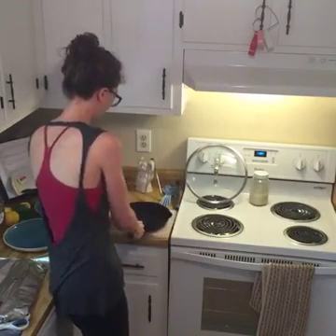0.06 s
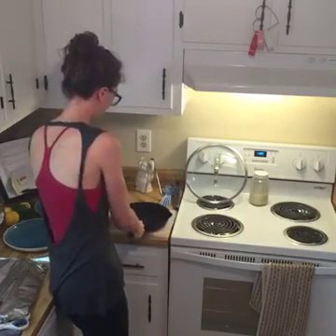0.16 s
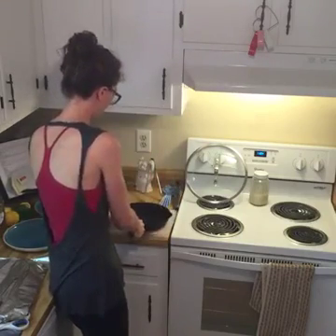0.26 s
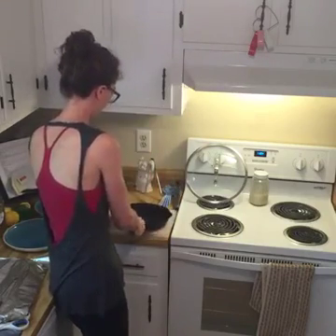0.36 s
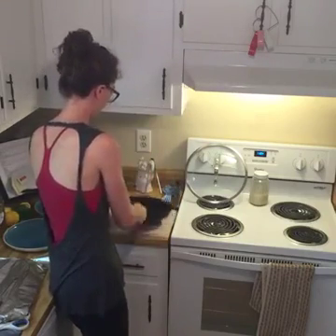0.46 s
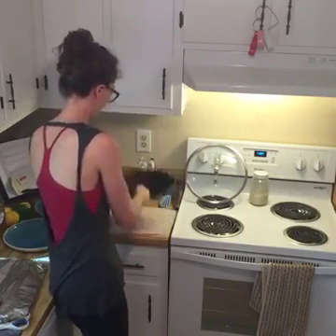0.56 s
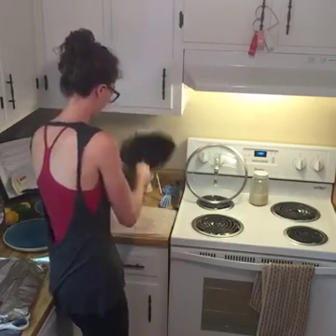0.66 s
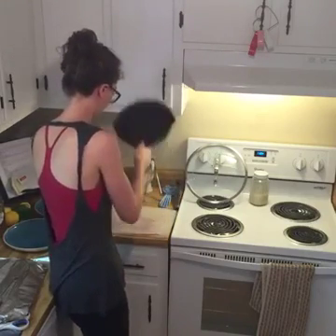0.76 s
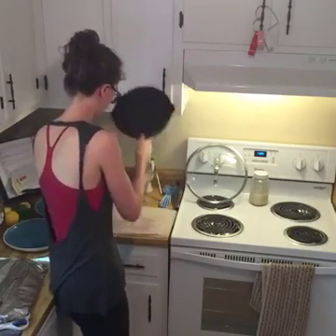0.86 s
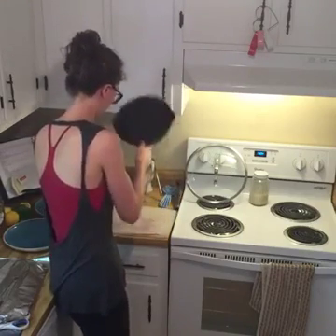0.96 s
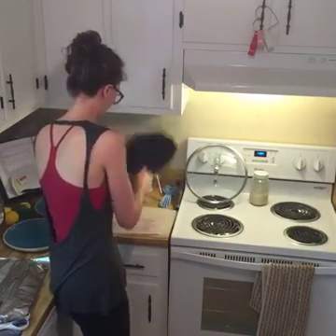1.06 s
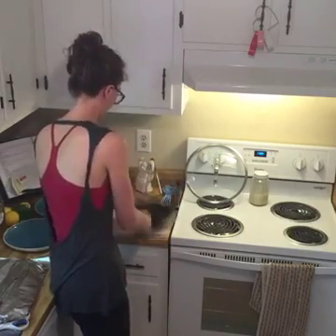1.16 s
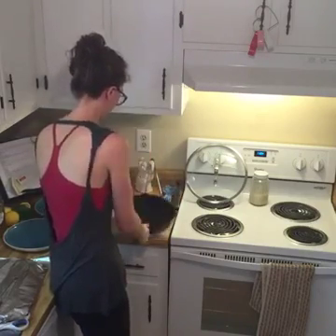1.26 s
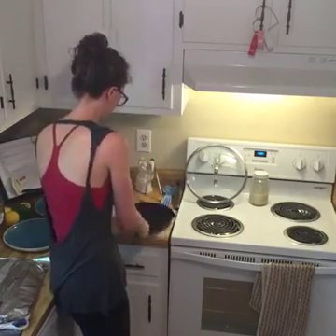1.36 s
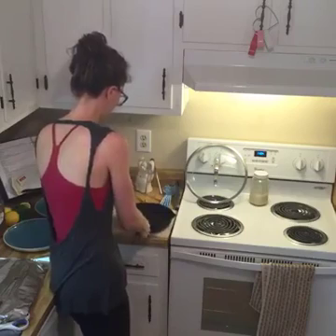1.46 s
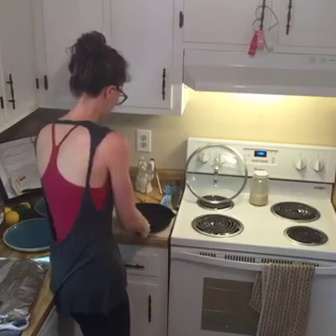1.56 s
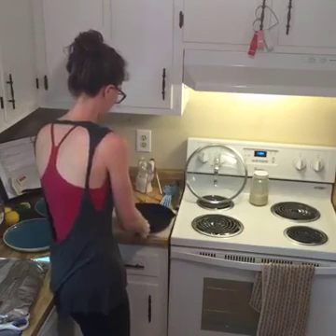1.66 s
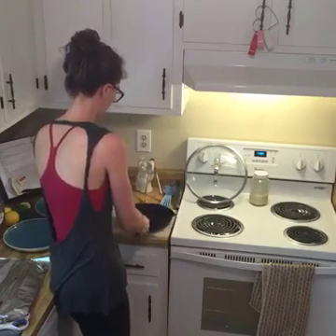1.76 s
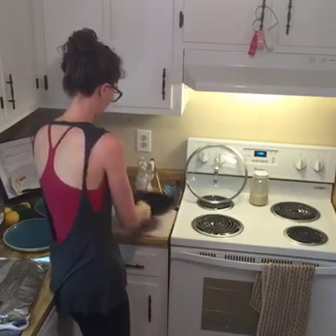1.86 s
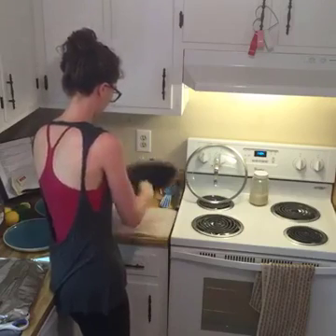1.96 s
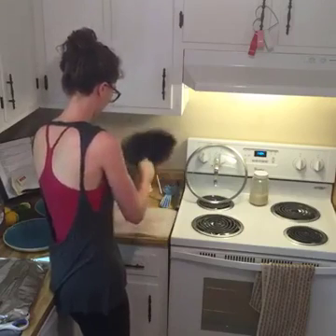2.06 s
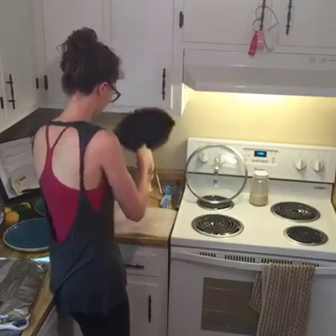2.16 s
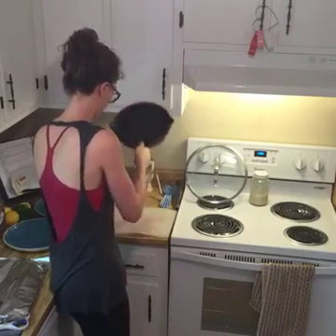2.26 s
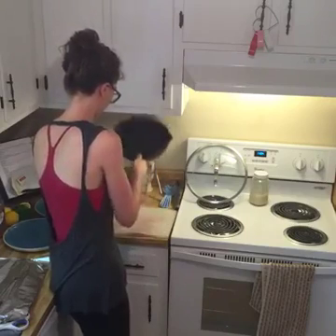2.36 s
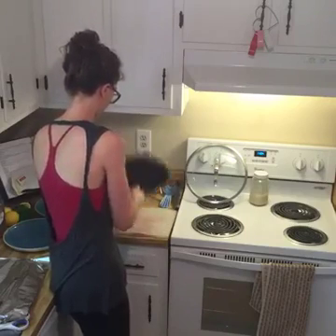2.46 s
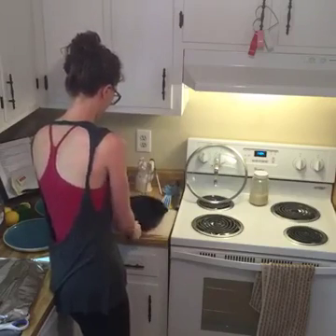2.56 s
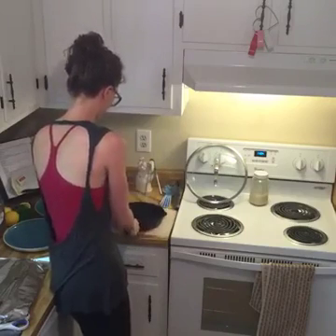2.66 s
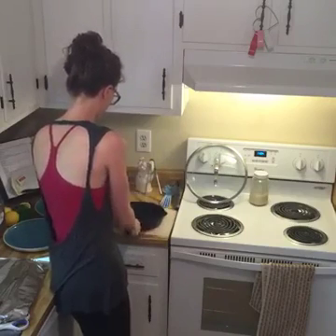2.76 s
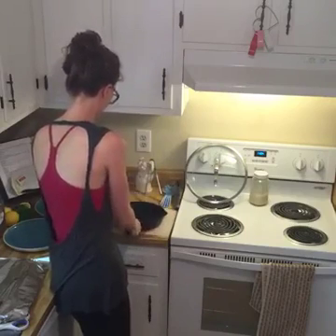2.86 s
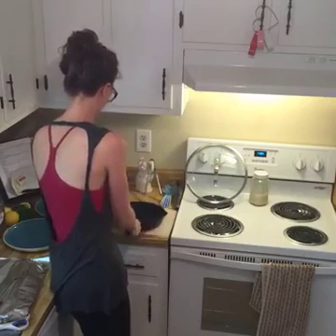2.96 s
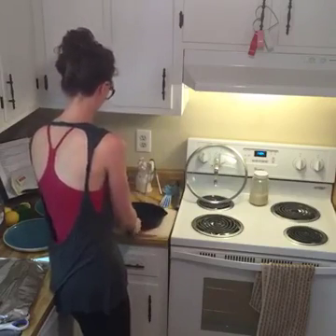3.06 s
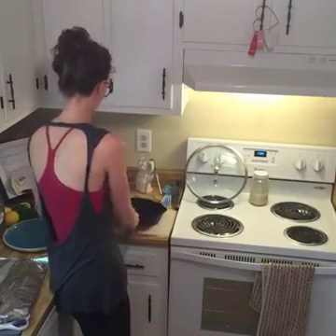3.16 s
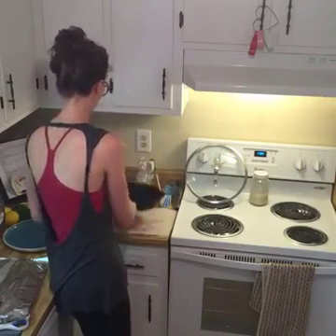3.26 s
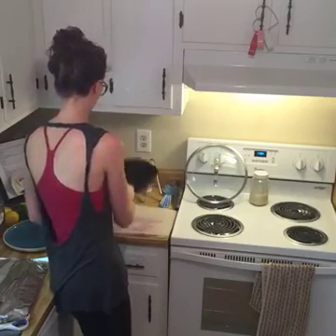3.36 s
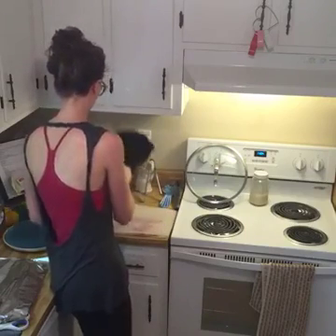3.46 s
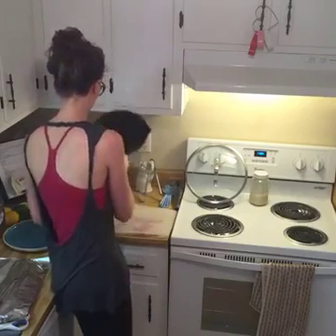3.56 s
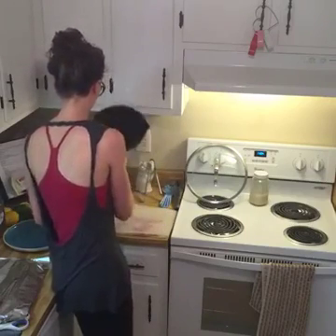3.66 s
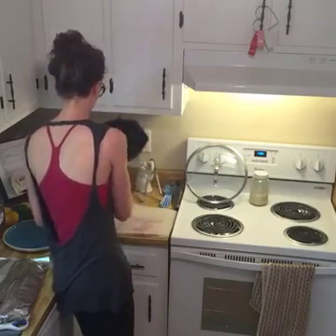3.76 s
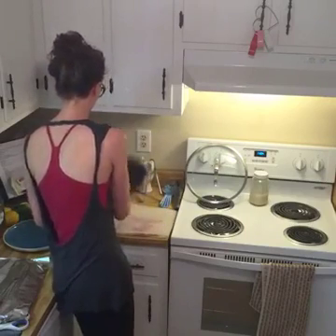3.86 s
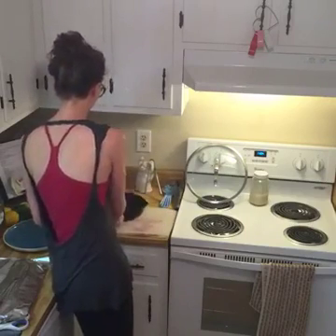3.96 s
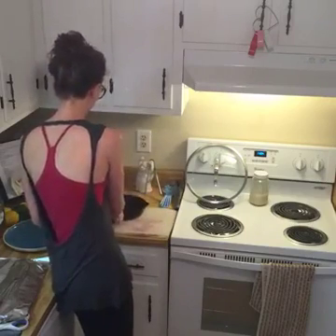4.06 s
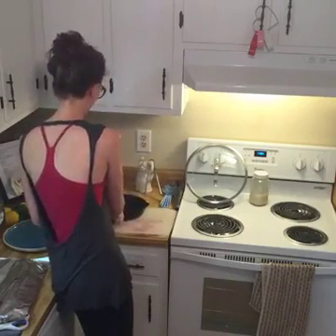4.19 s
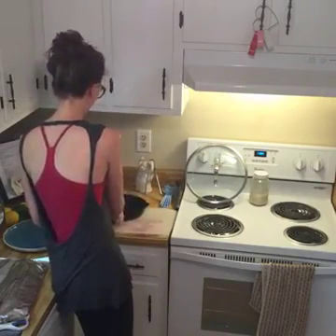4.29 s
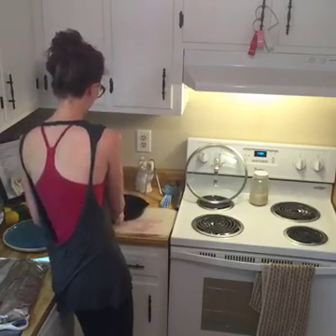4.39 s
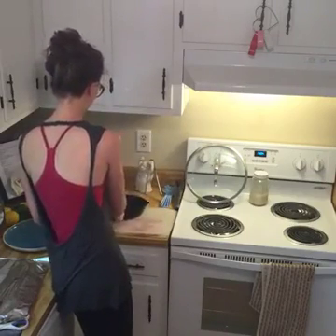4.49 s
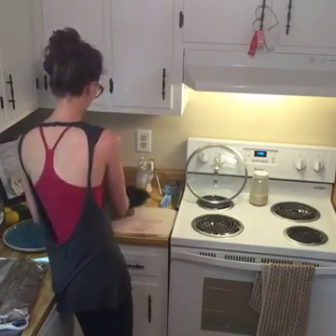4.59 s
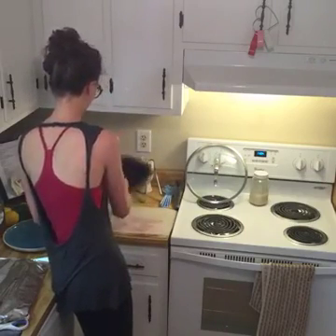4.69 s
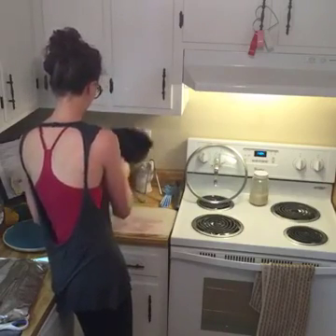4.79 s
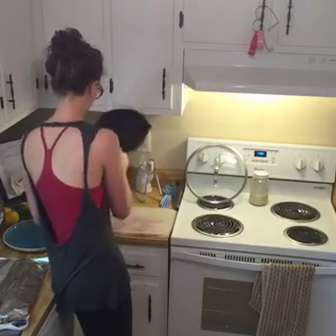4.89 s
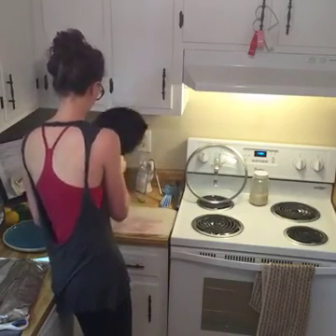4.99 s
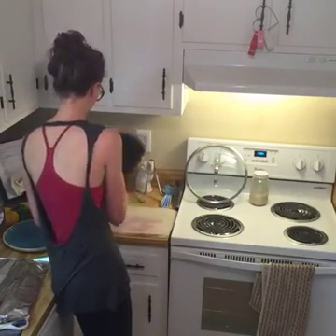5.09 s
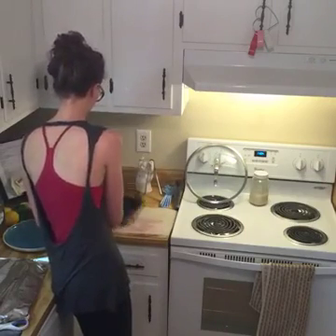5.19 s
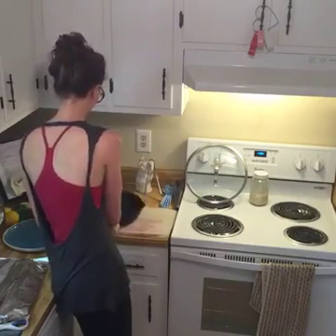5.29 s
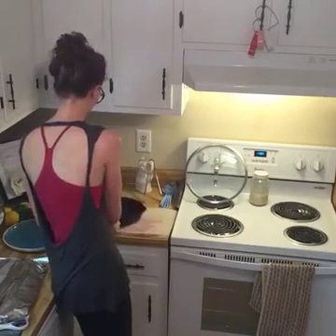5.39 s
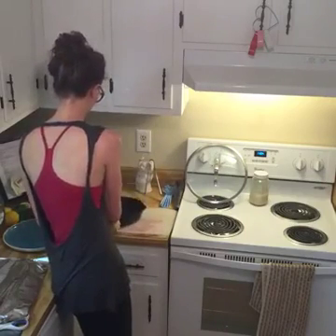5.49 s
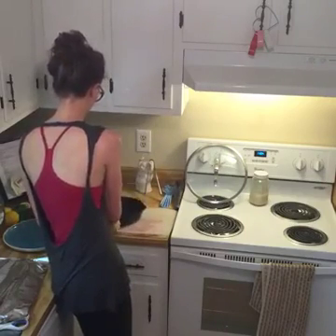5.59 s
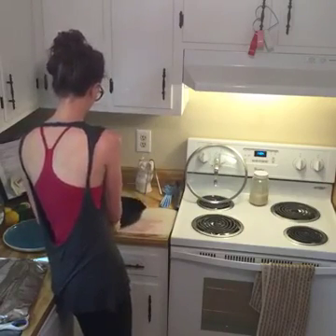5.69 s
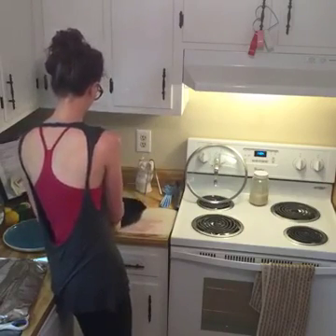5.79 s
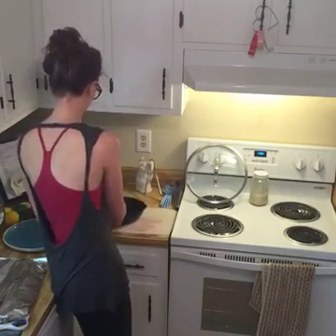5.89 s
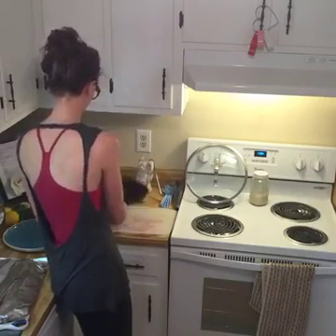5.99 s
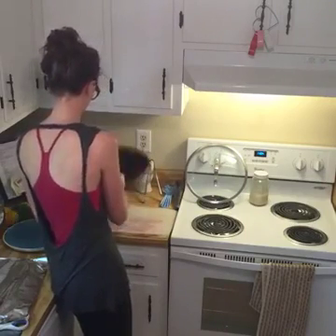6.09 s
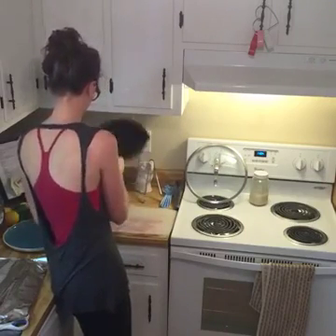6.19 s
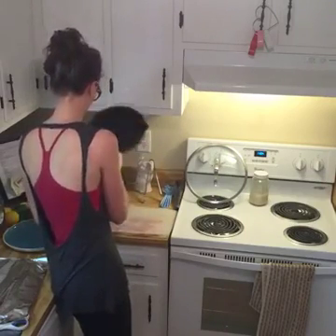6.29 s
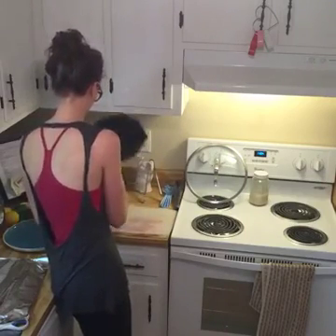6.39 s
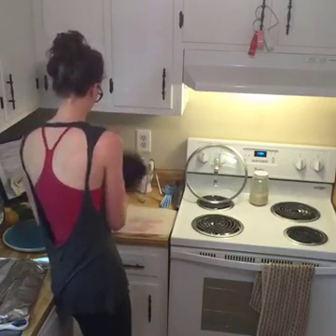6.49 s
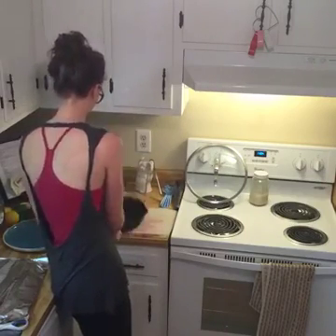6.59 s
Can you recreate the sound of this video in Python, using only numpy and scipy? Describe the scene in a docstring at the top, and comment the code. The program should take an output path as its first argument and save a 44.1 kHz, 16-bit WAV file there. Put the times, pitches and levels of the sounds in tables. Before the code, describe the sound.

In a small, reflective kitchen with a quiet hum, a heavy pan slaps raw meat on a cutting board at an even, slow pace. Each sharp, wet crack carries a deep counter thump and short pan ring, then loose burners and glass rattle briefly. Rim clanks follow the later blows. The close single microphone distorts slightly on the peaks.

```python
"""A small kitchen, one microphone, with a steady bed of still air and faint appliance hum throughout.
A heavy frying pan is swung down six times onto raw chicken on a cutting mat: each blow is a noise-burst
crack with two pops of trapped air, a counter thump, and ringing modes of board and pan. Loose glass and
burners then chatter as random taps; from the second blow on come rim strikes, then tacky nudges, one tink
and, late on, thin jingles. Dense reflections make it roomy, and loud peaks saturate the microphone."""
import sys
import numpy as np
from scipy import signal
from scipy.io import wavfile

SR = 44100
rng = np.random.default_rng(int(sys.argv[2]) if len(sys.argv) > 2 else 0)


def materialize(psi):
    """Save the field psi as 16-bit PCM at rate SR to the path in sys.argv[1].

    A 1-D psi becomes a single channel; in a 2-D psi each row is a channel.
    """
    bounded = np.clip(np.atleast_2d(psi).T, -1, 1)
    quanta = np.round(bounded * 32767).astype(np.int16)
    wavfile.write(sys.argv[1], SR, quanta)


N = 292912
LEAD = 8820  # lead-in [samples], so that a blow may fall before time zero
TIME = np.arange(-LEAD, N) / SR  # scene clock [s]
AGE = np.arange(SR) / SR  # time since a contact [s]

# All levels are relative: the mix sets the balance of the layers.
# Still air of the kitchen: (frequency [Hz], density [dB per Hz])
AIR = [(12, -58), (20, -34), (70, -2), (166, -7.5), (252, -5.5), (297, -12.5), (427, -9.5), (549, -20.5),
       (597, -16), (1100, -25), (1200, -21), (1300, -24), (4680, -29), (15500, -40.5)]
# Faint appliance hum: (frequency [Hz], rms level [dB])
HUM = [(96.9, -76.5), (236.9, -72), (430.7, -82), (586.8, -83), (1238, -90.5)]
# Blows of the pan: (time [s], force [dB], crack decay [s], brightness [dB per octave], lower pop [Hz],
# upper pop [Hz], upper pop level [dB], rebound [dB], thump [dB], then the shaking it sets off:
# delay [s], length [s], burner rattle [dB], glass rattle [dB])
BLOWS = [(-.062, -1, 0.016, 0.5, 1405, 1980, -19, -26, -9.5, 0.2, 0.067, -36.5, -69.5),
         (1.230, 3.5, .012, 0.13, 666.5, 1902, -2.5, -5.5, -9.5, 0.26, 0.037, -40, -42),
         (2.558, 3, .015, 0.41, 1171, 2262, -5.5, -22.5, -5, .19, 0.071, -42, -74),
         (3.945, 0.5, .018, -0.31, 937, 1730, -8.5, -25, -.5, .14, .13, -40, -51),
         (5.238, -.5, .023, 1.1, 989, 2450, -1, -16.5, -2, 0.22, 0.099, -30, -37),
         (6.601, 4, .011, 1.7, 887, 2060, -1, -23.5, -1.5, 0.22, .08, -36, -49)]
# Colour of the wet crack: (frequency [Hz], level [dB])
CRACK = [(60, -8), (200, 2), (330, -4), (600, -2), (1000, -2), (1900, -1.5), (3200, -4.5), (4800, -11.5),
         (6500, -13.5), (10000, -17.5), (12500, -26), (15500, -36.5)]
# Level of a part driven by the blow: (level at force 0 [dB], slope [dB per dB of force])
POP_LAW = (-5.5, 1.5)
BOARD_LAW = (-19.5, 2.3)
PAN_LAW = (-26.5, 2)
# Modes of counter and cabinet: (frequency [Hz], level [dB], t60 [s])
COUNTER = [(39, -6.5, 0.088), (62.5, 0, .127), (110, 5, .1), (134.2, -8.5, 0.19), (165, -0.5, .054),
           (93.3, -10.5, 0.2), (208.4, -17, 0.3)]
# Modes of the pan: (frequency [Hz], level [dB], t60 [s])
PAN = [(1835, -2.5, 0.2), (2270, -3, 0.34), (2512, -0.5, 0.37), (2953, 0.5, 0.23), (3027, -0.5, .3),
       (3145, -3.5, 0.42), (3280, -6, 0.27), (3390, -2.5, 0.31), (3780, -2.5, 0.39), (3710, 1.5, .27),
       (4220, -5.5, .33), (5280, -10.5, .2), (6170, -14, .3), (6470, -12, .28), (10400, -17, .26),
       (12188, -13, 0.28)]
# Modes of cutting board and worktop: (frequency [Hz], level [dB], t60 [s])
BOARD = [(340.4, -12, 0.31), (441, -8.5, 0.091), (603.5, -2.5, 0.2), (659, -4.5, 0.22), (719, -6.5, 0.12),
         (857, -6.5, 0.42), (937, -1, 0.31), (1145, -1, .24), (1246, -0.5, 0.22), (1414, -4, 0.35),
         (1707, -5, 0.26)]
# Low shuddering of the cabinet: (frequency [Hz], level [dB])
SHUDDER = [(20, -25), (55, -4.5), (90, -0.5), (150, -1.5), (210, -4), (280, -18.5), (600, -40),
           (4000, -70.5)]
# Kitchen reverberation: (frequency [Hz], t60 [s])
ROOM = [(80, 0.39), (250, .42), (700, 0.31), (1500, 0.38), (3000, 0.38), (6000, 0.41), (10000, 0.36),
        (15000, .3)]
# Answer of loose things to a blow: (first jolt after [s], jolt half length [s], jolt [dB],
# swell [s], fade [dB per s])
GLASS_SHAKE = (.095, .014, 13, .018, 240)
BURNER_SHAKE = (0.2, 0.0222, -4, 0.0536, 187)
# Resonances of a glass lid and a jar: (frequency [Hz], width [Hz], level [dB])
GLASS = [(2300, 100, 1.5), (4300, 49, 2), (5780, 500, -4), (6750, 250, -3), (8800, 260, 1),
         (10220, 540, -9), (11100, 230, -5.5)]
# Tinny colour of the burners in the stove top: (frequency [Hz], level [dB])
BURNERS = [(100, -10), (400, -5.5), (700, -2), (1300, 3.5), (2200, 1.5), (3000, -7), (3900, -17),
           (6500, -24.5), (11000, -26.5), (14000, -39.5)]
# Strikes of the pan's rim: (time [s], level [dB], decay [s])
CLATTERS = [(1.298, -27, .0083), (2.605, -20, 0.0078), (3.991, -9, 0.019), (4.010, -.5, .0085),
            (5.263, -10.5, 0.014), (5.325, -12.5, 0.033)]
# Colour of metal on the wet board, shared by the squelch: (frequency [Hz], level [dB])
RIM = [(100, -14), (500, 0.5), (1200, -4.5), (2200, -3), (3300, 4), (4500, -3.5), (6400, -2), (7800, -10),
       (9000, -9.5), (11300, -9.5), (12200, -20.5), (15500, -36.5)]
# The pan shifted and peeled off the meat: (time [s], tick level [dB], decay [s], thump level [dB])
NUDGES = [(1.921, -70, .008, -52), (3.067, -49.5, .011, -55), (3.123, -55.5, 0.026, -49.5),
          (4.418, -56.5, .01, -39), (4.497, -52, 0.03, -31), (4.549, -66, .014, -42),
          (5.799, -56.5, .031, -48.5), (5.885, -57.5, 0.039, -50)]
# Soft, tacky colour of that shifting: (frequency [Hz], level [dB])
TACK = [(100, 2), (400, -0.5), (900, 3.5), (1700, 3.5), (3300, -3), (4500, -12.5), (9000, -28),
        (14000, -22)]
# One tiny tink as the pan is lifted: (time [s], level [dB])
TINK = [(3.357, -58)]
# Its ring: (frequency [Hz], level [dB], t60 [s])
TINK_MODE = [(3290, 0, .05)]
# Something small and loose jingling after the fifth blow: (time of height [s], half length [s], level [dB])
JINGLES = [(5.798, .02, -61), (5.905, 0.028, -60), (6.082, 0.023, -59.5), (6.223, 0.024, -53.5)]
# Its resonances: (frequency [Hz], width [Hz], level [dB])
JINGLE = [(1810, 85, 1.5), (4580, 170, -1), (5750, 210, 4), (6900, 220, -2.5), (8600, 280, -1.5),
          (10500, 690, -9)]

# The pan lands again on the flattened meat, whose smaller air pocket pops higher
REBOUND_S, REBOUND_PITCH = 0.026, 1.88
# After a rim strike the pan rocks and touches again, softer and longer; its ring follows the strike
ROCK_S, ROCK_DB, ROCK_STRETCH, RIM_RING_DB = 0.06, -21, 1.8, -20


def amp(db):
    """Decibels to gain."""
    return 10 ** (np.asarray(db) / 20)


def evened(x):
    """Scales to rms 1."""
    return x / np.sqrt(np.mean(x ** 2) + 1e-20)


def read(points, hz):
    """Reads a table on a log-frequency axis."""
    f, value = np.transpose(points)
    return np.interp(np.log(hz + 1), np.log(f + 1), value)


def add(mix, s, sound):
    """Lays a sound into the mix at time s."""
    part = mix[max(round(s * SR) + LEAD, 0):][:len(sound)]
    part += sound[:len(part)]


def through(x, response):
    """Convolves and keeps the length."""
    return signal.oaconvolve(x, response)[:len(x)]


def colour(db_at, size=4096):
    """Causal (minimum-phase) impulse response of energy 1 for a dB curve over frequency."""
    hz = abs(np.fft.fftfreq(size, 1 / SR))
    log_gain = np.log(amp(db_at(hz)) + 1e-6)
    spectrum = np.exp(np.conj(signal.hilbert(log_gain)))
    response = np.fft.ifft(spectrum).real[:size // 2]
    return response / np.linalg.norm(response)


def shape(points):
    """Impulse response for a spectrum table."""
    return colour(lambda hz: read(points, hz))


def resonances(peaks):
    """Impulse response of a few broad resonances (frequency [Hz], width [Hz], level [dB])."""
    def db_at(hz):
        power = sum(amp(db) ** 2 / (1 + ((hz - f) / width) ** 2) ** 2 for f, width, db in peaks)
        return 10 * np.log10(power + 1e-5)
    return colour(db_at)


def burst(decay, rise=0.001):
    """Noise for a spray of tiny contacts that spreads quickly and dies."""
    fade = np.exp(-AGE / max(decay, 1e-4))
    return rng.standard_normal(SR) * fade * (1 - np.exp(-(AGE / rise) ** 2))


def contacts(rows, spectrum, rise):
    """Short noisy contacts of one colour; rows start (time [s], level [dB], decay [s])."""
    out = np.zeros(len(TIME))
    for s, db, decay, *_ in rows:
        add(out, s, amp(db) * burst(decay, rise))
    return through(out, shape(spectrum))


def ring(modes):
    """Exponentially decaying modes struck together."""
    out = np.zeros(len(AGE))
    for hz, db, t60 in modes:
        fade = np.exp(-np.log(1000) * AGE / t60)
        out += amp(db) * fade * np.sin(2 * np.pi * hz * AGE)
    return out


def struck(modes, hits, rise):
    """Rings an object at each (time [s], level [dB]); a cushioned blow swells before it dies."""
    sound = ring(modes) * (1 - np.exp(-(AGE / rise) ** 2))
    out = np.zeros(len(TIME))
    for s, db in hits:
        add(out, s, amp(db) * sound)
    return out


def taps(per_s, spread_db):
    """Random clicks of uneven size and either sign."""
    size_db = spread_db * np.clip(rng.standard_normal(len(TIME)), -2, 2)
    size = rng.choice([-1, 1], len(TIME)) * amp(size_db)
    return evened((rng.random(len(TIME)) < per_s / SR) * size)


def rattle(level, response, per_s, spread_db):
    """Loose things tap many times while the shaking swells and fades."""
    return through(level * taps(per_s, spread_db), response)


def swell(s, half):
    """A smooth rise and fall about time s."""
    return np.exp(-.5 * ((TIME - s) / half) ** 2)


def shaking(rule, blows):
    """Each (time, delay, length, level) jolts a loose thing; then its shaking swells, holds and fades."""
    jolt_s, jolt_half, jolt_db, rise, fade_db_per_s = rule
    level = np.zeros(len(TIME))
    for s, delay, length, db in blows:
        jolt = amp(jolt_db) * swell(s + jolt_s, jolt_half)
        fade = amp(-fade_db_per_s * np.maximum(TIME - s - delay - length, 0))
        later = np.where(TIME < s + delay, swell(s + delay, rise), fade)
        level += amp(db) * (jolt + later)
    return level


def follow(law, force_db):
    """Level of a part that is driven by the blow."""
    base_db, slope = law
    return base_db + slope * force_db


def landings():
    """Each blow and its rebound: time, force, decay, brightness, lower pop, upper pop, its level."""
    for s, db, decay, bright_db, low_hz, high_hz, high_db, rebound_db, *_ in BLOWS:
        yield s, db, decay, bright_db, low_hz, high_hz, high_db
        again_hz = low_hz * REBOUND_PITCH
        yield s + REBOUND_S, db + rebound_db, decay, bright_db, again_hz, high_hz, high_db + rebound_db


def pushes():
    """The weight of each blow on the counter: (time [s], level [dB])."""
    return [(s, thump_db) for s, *_, thump_db, delay, length, burner_db, glass_db in BLOWS]


def rim_strikes():
    """Each rim strike and the softer touch as the pan rocks: (time [s], level [dB], decay [s])."""
    rocks = [(s + ROCK_S, db + ROCK_DB, decay * ROCK_STRETCH) for s, db, decay in CLATTERS]
    return CLATTERS + rocks


def background(air_db=-63, roll_off_hz=13000):
    """Still air as shaped noise, fading in the top octave, and a faint hum of steady sines."""
    tone = colour(lambda hz: read(AIR, hz) - 10 * np.log10(1 + (hz / roll_off_hz) ** 10))
    air = evened(through(rng.standard_normal(len(TIME)), tone))
    hum = np.zeros(len(TIME))
    for hz, db in HUM:
        hum += amp(db) * np.sqrt(2) * np.sin(2 * np.pi * (hz * TIME + rng.random()))
    return amp(air_db) * air + hum


def cracks(wetting=.007, early=.0035, squash=.011, pop_decay=.017, pop_width=.17):
    """Wet meat slaps the pan's base; as it flattens, the trapped air pops out at two pitches."""
    out = np.zeros(len(TIME))
    for s, db, decay, bright_db, low_hz, high_hz, high_db in landings():
        # the brightness tilt pivots near 1 kHz
        tone = colour(lambda hz: read(CRACK, hz) + bright_db * np.log2((hz + 20) / 1000))
        add(out, s - early, amp(db) * through(burst(decay, wetting), tone))
        for pop_hz, pop_db in (low_hz, follow(POP_LAW, db)), (high_hz, high_db):
            pocket = colour(lambda hz: -20 * np.log10(1 + ((hz / pop_hz - 1) / pop_width) ** 2))
            add(out, s, amp(pop_db) * through(burst(pop_decay, squash), pocket))
    return out


def thumps(early=0.0014):
    """The counter is pushed down, away from the listener (hence the minus), and swings back."""
    hits = [(s - early, thump_db) for s, *_, thump_db in pushes() + NUDGES]
    return -struck(COUNTER, hits, rise=0.017)


def squelch(db=-30, decay=.075, per_s=450, spread_db=3.0):
    """Tiny wet bubbles burst while the meat spreads under the pan."""
    level = sum(np.exp(-abs(TIME - s) / decay) * (TIME > s) for s, *_ in BLOWS)
    return amp(db) * rattle(level, shape(RIM), per_s, spread_db)


def pan_ring():
    """The meat damps the pan, so its modes swell slowly; a strike on the rim starts them faster."""
    damped = struck(PAN, [(s, follow(PAN_LAW, db)) for s, db, *_ in landings()], rise=.012)
    return damped + struck(PAN, [(s, db + RIM_RING_DB) for s, db, _ in rim_strikes()], rise=0.0046)


def board():
    """The board's modes knock under each blow and rebound."""
    return struck(BOARD, [(s, follow(BOARD_LAW, db)) for s, db, *_ in landings()], rise=0.013)


def shudder(db=-34, decay=.21):
    """A low noise rumble lingers in the cabinet, its level following the thump."""
    return contacts([(s, db + thump_db, decay) for s, thump_db in pushes()], SHUDDER, rise=.03)


def kitchen(x, build=.005):
    """Dense reflections from cupboards and walls, each band dying at its own speed."""
    hz, t, bands = signal.stft(rng.standard_normal(SR), SR, nperseg=256)
    bands = bands * np.exp(-np.log(1000) * t / read(ROOM, hz)[:, None])
    tail = signal.istft(bands, SR, nperseg=256)[1][:SR]
    tail *= 1 - np.exp(-AGE / build)
    return through(x, tail / np.linalg.norm(tail))


def glass_chatter():
    """A glass lid and a jar, jolted by each blow, tap at their own resonances."""
    blows = [(s, delay, length, db) for s, *_, delay, length, _, db in BLOWS]
    return rattle(shaking(GLASS_SHAKE, blows), resonances(GLASS), per_s=310, spread_db=2.5)


def burner_chatter():
    """Burners shaken in the stove top tap densely and sound tinny."""
    blows = [(s, delay, length, db) for s, *_, delay, length, db, _ in BLOWS]
    return rattle(shaking(BURNER_SHAKE, blows), shape(BURNERS), per_s=900, spread_db=5.5)


def rim_clatter():
    """The pan's rim strikes, then rocks and touches again: short bursts of metallic noise."""
    return contacts(rim_strikes(), RIM, rise=.003)


def tacky_nudges():
    """The pan shifts on the meat and peels off in soft, noisy ticks."""
    return contacts(NUDGES, TACK, rise=0.0024)


def tink():
    """One small decaying mode as the pan is lifted."""
    return struck(TINK_MODE, TINK, rise=.002)


def jingle(sizzle_hz=5810, width_hz=190, sizzle_s=5.9, sizzle_half=0.2, sizzle_db=-68):
    """A few thin jingles of resonant taps over a faint high sizzle that lingers."""
    level = sum(amp(db) * swell(s, half) for s, half, db in JINGLES)
    sizzle_level = amp(sizzle_db) * swell(sizzle_s, sizzle_half)
    sizzle = rattle(sizzle_level, resonances([(sizzle_hz, width_hz, 0)]), per_s=600, spread_db=2.5)
    return rattle(level, resonances(JINGLE), per_s=1000, spread_db=1.5) + sizzle


def scene():
    """Blows, the ringing pan and the shaken things, heard directly and by way of the room."""
    sharp = cracks() + squelch() + glass_chatter() + burner_chatter() + rim_clatter() + tacky_nudges()
    ringing = pan_ring() + board() + tink()
    low, thin = thumps(), jingle()
    direct = amp(-2.5) * sharp + amp(0.5) * ringing + amp(7.5) * low + amp(-3.0) * thin + shudder()
    echo = kitchen(amp(-1.5) * sharp + amp(-14.0) * ringing + amp(-13) * low + amp(-9) * thin)
    return (direct + echo + background())[None, LEAD:]


def record(dry, low_cut_hz=22, threshold_db=-5, share=0.14, recover_db_per_s=6, knee=7, edge_hz=15650):
    """The microphone sheds the lowest bass; gain control ducks loud sound; peaks saturate; treble ends."""
    heard = signal.sosfilt(signal.butter(1, low_cut_hz, "high", fs=SR, output="sos"), dry)
    power = signal.lfilter(np.ones(256) / 256, 1, heard[0] ** 2)  # mean over 256 samples
    power_db = 10 * np.log10(abs(power) + 1e-12)
    # a held peak that falls at a steady rate in dB
    fall = np.arange(N) * recover_db_per_s / SR
    held_db = np.maximum.accumulate(power_db + fall) - fall
    over_db = np.maximum(held_db - threshold_db, 0)
    ducked = heard * amp(-share * over_db)
    loud = ducked / (1 + abs(ducked) ** knee) ** (1 / knee)
    band_limit = signal.firwin(511, edge_hz, window=("kaiser", 8), fs=SR)
    return signal.oaconvolve(loud, band_limit[None], "same")


dry = scene()
out = record(dry)
materialize(out)
```